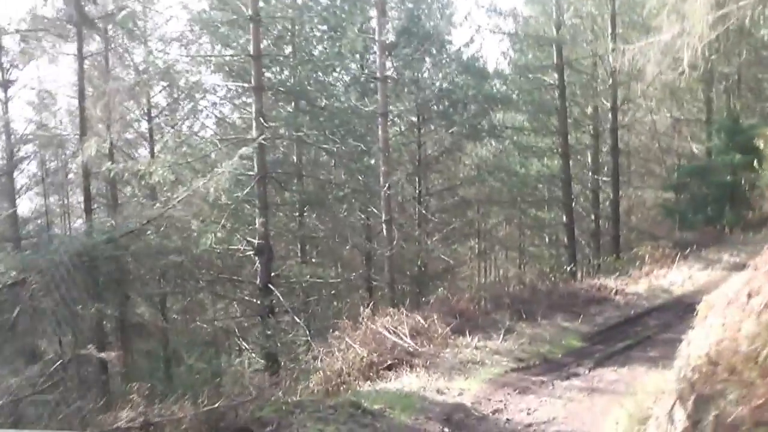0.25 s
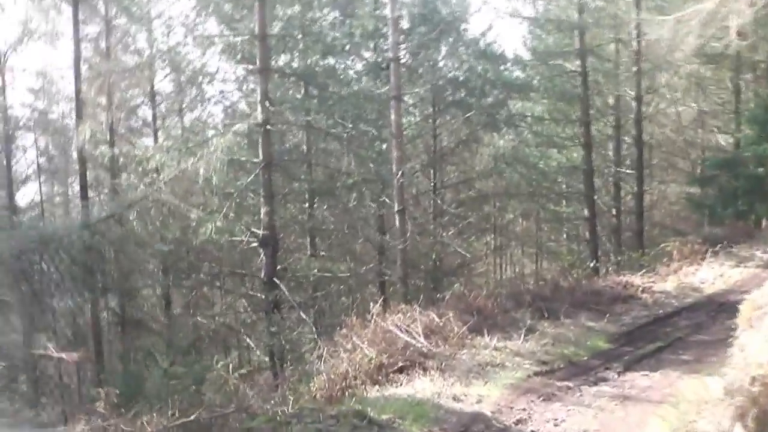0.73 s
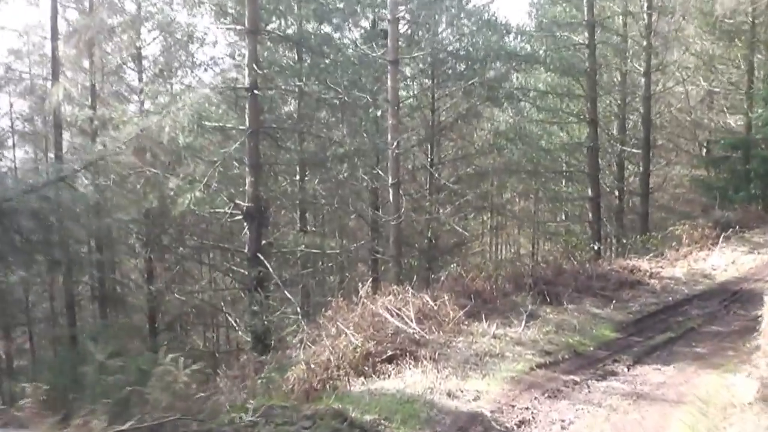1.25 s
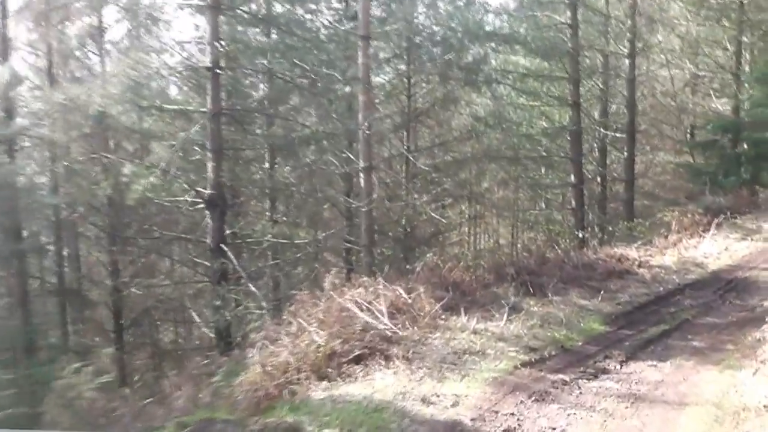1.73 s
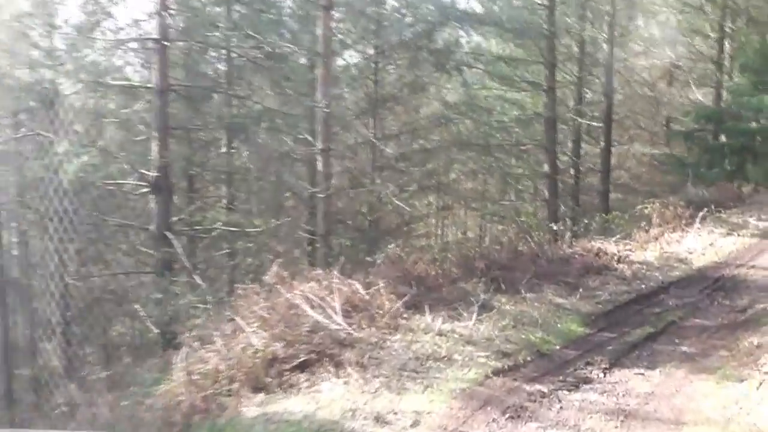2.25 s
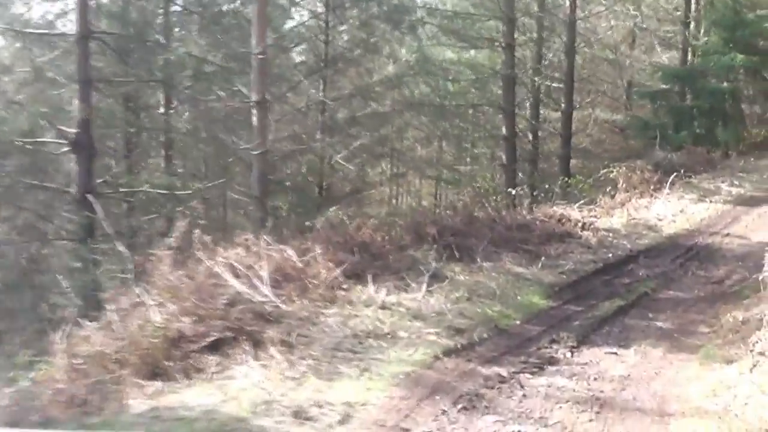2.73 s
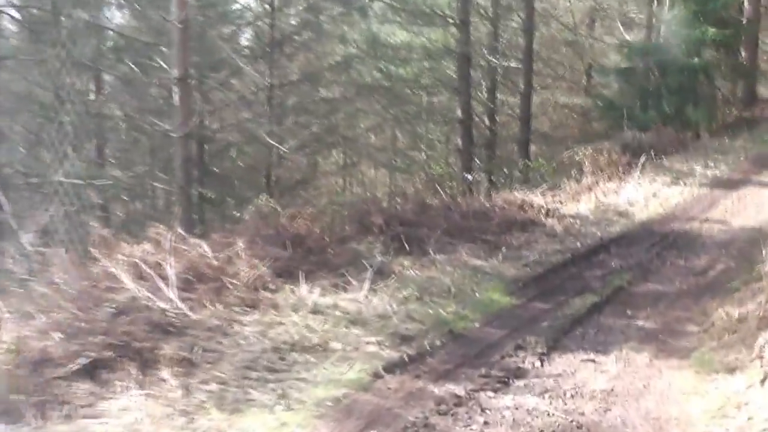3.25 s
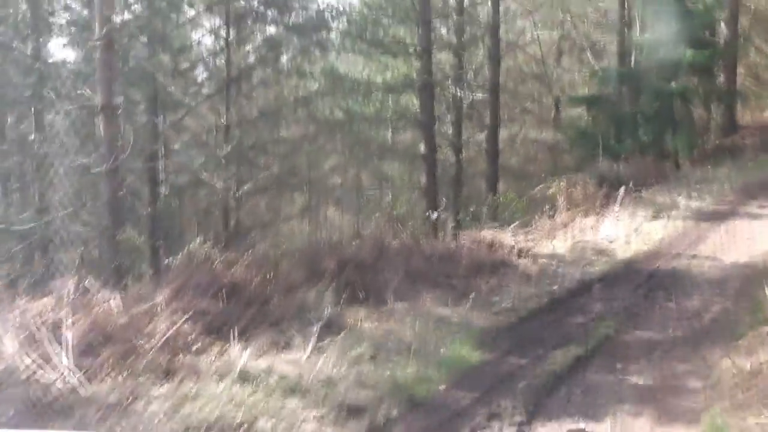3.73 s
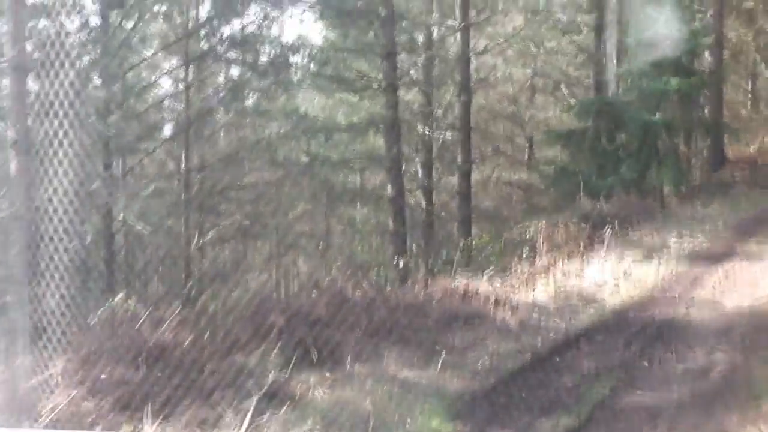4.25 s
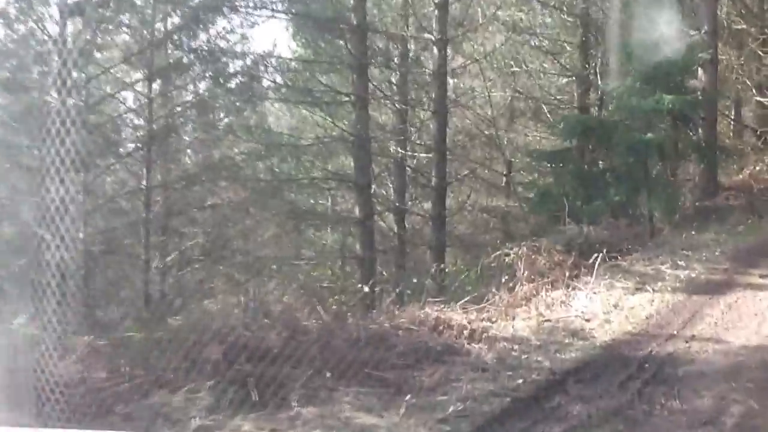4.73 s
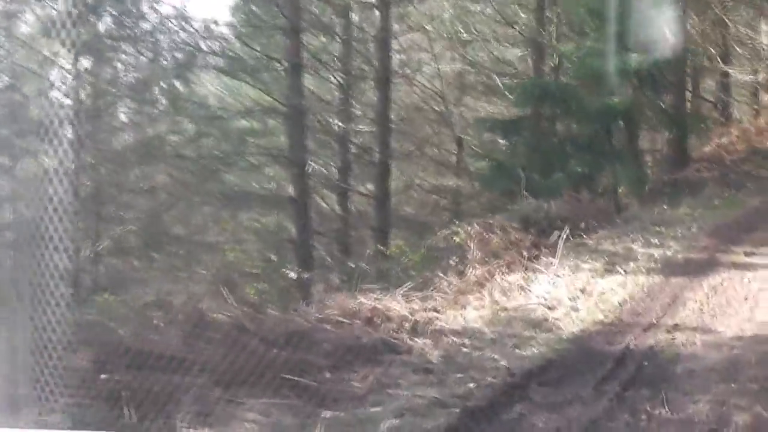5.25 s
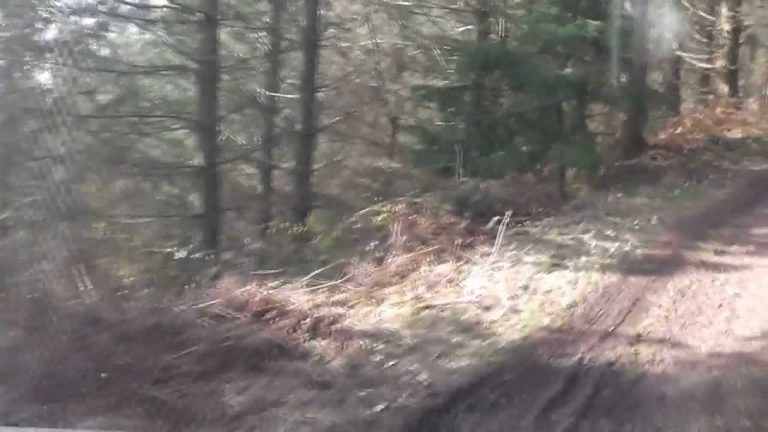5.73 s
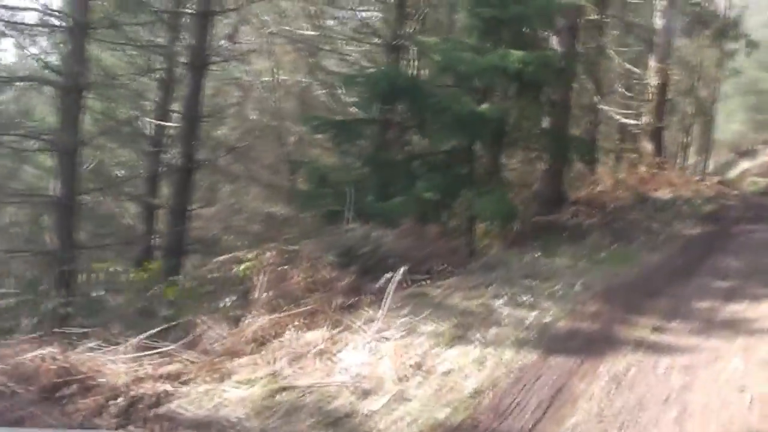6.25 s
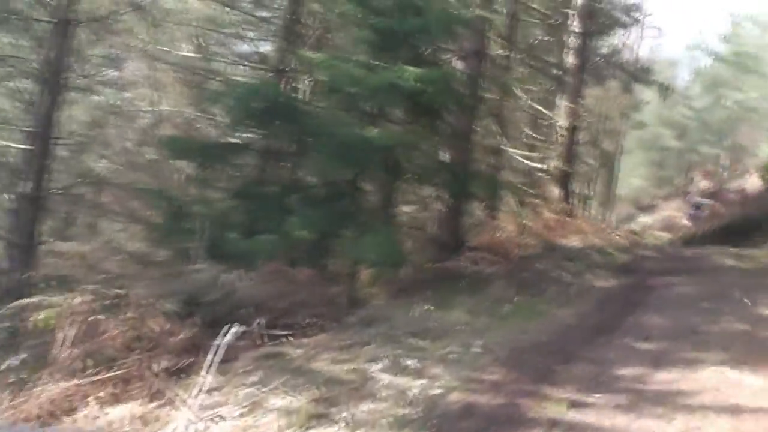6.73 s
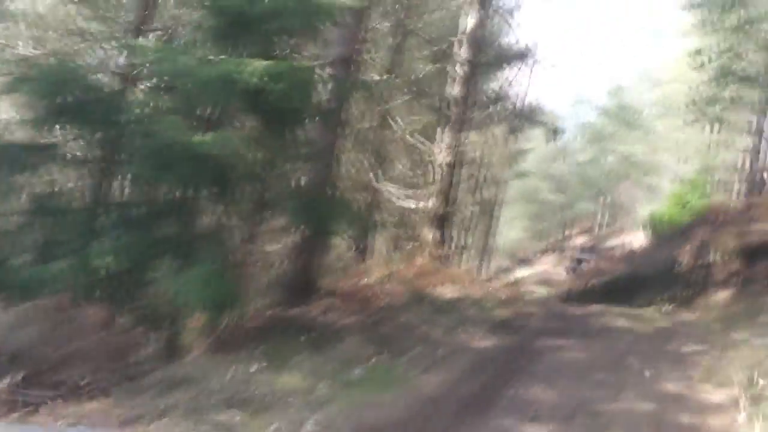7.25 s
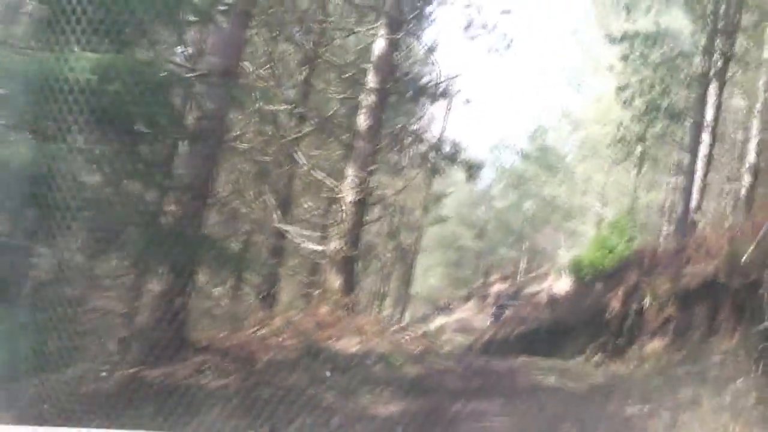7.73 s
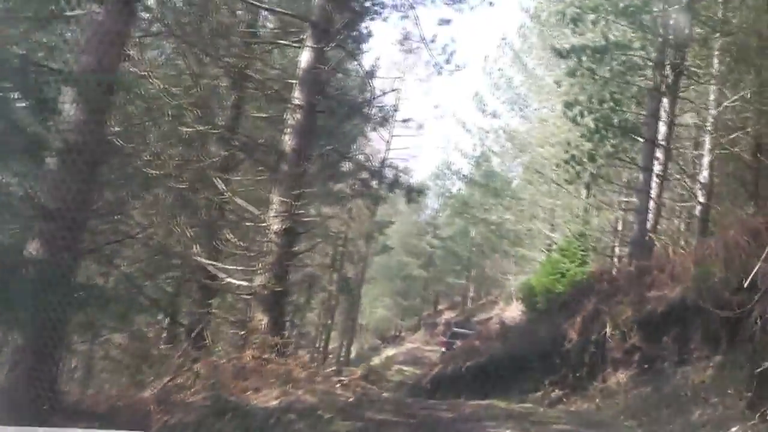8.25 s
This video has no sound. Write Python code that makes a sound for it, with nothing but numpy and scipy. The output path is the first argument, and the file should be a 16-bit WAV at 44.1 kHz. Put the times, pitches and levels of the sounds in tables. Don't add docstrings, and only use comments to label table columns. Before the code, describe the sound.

Inside a four-wheel-drive crawling over a rutted forest track, a small stereo microphone near the dashboard catches a deep boom near 28 Hz that swells with each rut. At 0-0.6 s heavy suspension thuds and two loud trim clacks hit, almost overloading, with keys shaken briefly; another thud lands at 1 s. A low four-cylinder hum, faint gear whine and fine rustling hiss continue. Around 2.1 s a softer thump, then at 2.7-2.9 s knocks and a dull clack. Near 4.1 s a strong jolt, with tiny dry squeaks at 3.9, 4.1 and 4.8 s. Engine pitch climbs from 5 to 6 s. Bumps at 5.6 s and a heavy double thud at 6.1 s follow. A hard clack cracks at 7.2 s with dull slaps after; at 7.85 s thuds toss the keys loudly, then ticks and rumble trail to 8.5 s.

```python
import sys
import numpy as np
from scipy import signal
from scipy.fft import rfft, irfft, next_fast_len
from scipy.io import wavfile
from scipy.ndimage import uniform_filter1d

SR = 44100
rng = np.random.default_rng(int(sys.argv[2]) if len(sys.argv) > 2 else 0)


def wav_record(signal):
    frames = np.transpose(np.atleast_2d(signal))
    bounded = np.clip(frames, -1, 1)
    quanta = np.round(bounded * 32767).astype(np.int16)
    wavfile.write(sys.argv[1], SR, quanta)


def amplitude_ratio(level_db):
    exponent = np.asarray(level_db, float) / 20
    return 10 ** exponent


N = 374409


def unit(x):
    return x / np.sqrt(np.mean(x ** 2) + 1e-20)


def in_time(rows):
    s, *columns = np.transpose(rows)
    return [np.interp(np.arange(N) / SR, s, c) for c in columns]


def at_hz(points, hz):
    point_hz, level_db = np.transpose(points)
    return np.interp(np.log(hz), np.log(point_hz), level_db)


def fine(coarse):
    return np.interp(np.arange(N) / 40, np.arange(len(coarse)), coarse)


def drift(rate):
    r = np.exp(-80 * np.pi * rate / SR)
    slow = signal.lfilter([1], [1, -2 * r, r * r], rng.standard_normal(N // 40 + 2002))
    return fine(unit(slow[2000:]))


def ring(drive, hz, t60):
    r, w = amplitude_ratio(-60 / (t60 * SR)), 2 * np.pi * hz / SR
    return signal.lfilter([0, np.sin(w)], [1, -2 * r * np.cos(w), r * r], drive + 1e-18)


# frequency in Hz, side against mid in dB.
WIDTH = [(30, -19.5), (200, -28.5), (380, -19.5), (700, -16), (1290, -13.5), (2380, -11.5), (4400, -7.5),
         (8120, -5), (15000, 2)]


def coloured(spectrum, even_s):
    length = next_fast_len(N)
    hz = np.maximum(np.fft.rfftfreq(length, 1 / SR), 1)
    colour = amplitude_ratio(at_hz(spectrum, hz)) * np.array([np.ones(len(hz)), amplitude_ratio(at_hz(WIDTH, hz))])
    pair = irfft(rfft(rng.standard_normal((2, length))) * colour, length)[:, :N]
    size = int(even_s * SR)
    power = uniform_filter1d(uniform_filter1d(pair[0] ** 2, size), size)
    return pair / np.sqrt(power + 1e-20)


def bursts(noise, times, peaks_db, swells, t60s):
    envelope = np.zeros(N)
    for s, db, swell, t60 in zip(times, peaks_db, swells, t60s):
        at = round(s * SR)
        age = np.arange(min(round(t60 * SR), N - at)) / SR
        envelope[at:at + len(age)] += amplitude_ratio(db - 60 * age / t60) * np.minimum(age / swell, 1)
    return noise * envelope


def swells(times, peaks_db, lengths):
    fade_db, rise_share = 20, 0.44
    times, peaks_db, lengths = [np.reshape(column, (-1, 1)) for column in (times, peaks_db, lengths)]
    late = np.arange(0, N + 40, 40) / SR - times
    share = np.where(late < 0, rise_share, 1 - rise_share)
    return amplitude_ratio(2 * (peaks_db - fade_db / 2 * np.abs(late) / (share * lengths)))


def centred(x, side_db):
    reflection = np.roll(x, round(0.005 * SR)) - np.roll(x, round(0.0018 * SR))
    return np.array([x, amplitude_ratio(side_db) * reflection])


# frequency in Hz, level in dB per Hz.
RUSTLE = [(1500, -90), (2600, -15), (3300, -12), (3750, -10.5), (4000, -5.5), (4300, -1), (5600, -4),
          (8300, -5.5), (9800, -2.5), (10600, -1), (11300, -3.5), (12500, -8), (15700, -12.5)]
# time in seconds, level in dB, brightness in dB.
ASTIR = [(0, -56, -1), (.2, -64.5, 2), (.58, -60.5, -2), (.9, -61.5, 3), (1.62, -64, 8.5), (1.78, -62, 6.5),
         (1.94, -66.5, 0), (2.12, -60.5, 3.5), (2.75, -64.5, 0), (4.36, -65.5, 1), (4.85, -64.5, -1.5),
         (4.98, -63, 3.5), (5.12, -62.5, -1.5), (5.6, -62.5, -1.5), (6.42, -60, -2.5), (7.79, -61, -1),
         (7.89, -55, -5), (8.48, -64, 4)]
# frequency in Hz, level in dB.
VENTS = [(3990, -75), (8420, -86), (9220, -83), (10600, -81), (13400, -88)]


def rustle():
    low_db, bright_db = in_time(ASTIR)
    hiss = coloured(RUSTLE, even_s=0.13)
    contacts = (rng.random((5, N)) < 70 / SR) * rng.exponential(.5, (5, N))
    shared, *own = signal.lfilter([1], [1, -np.exp(-1 / (.004 * SR))], contacts)
    above = [signal.sosfiltfilt(signal.butter(2, hz, "high", fs=SR, output="sos"), hiss)
             for hz in (2000, 4900, 6500, 9200)]
    bands = []
    for patch, wide, rest in zip(own, above, above[1:] + [0]):
        waver_db = 1.1 * drift(8.6) + 1.8 * drift(2.8)
        bands.append((1 + patch) * amplitude_ratio(waver_db) * (wide - rest))
    low = amplitude_ratio(low_db - 2.0) * unit(bands[0] + bands[1])
    bright = amplitude_ratio(low_db + bright_db - 2.0) * unit(bands[2] + bands[3])
    vents = sum(amplitude_ratio(db) * unit(ring(hiss, hz, 0.009)) * amplitude_ratio(3 * drift(2.8)) for hz, db in VENTS)
    return (1 + .3 * shared) * (low + bright) + vents


# time in seconds, firing rate in Hz.
FIRING = [(0, 39.5), (1.8, 39.6), (3.05, 44.6), (3.55, 43.2), (4.0, 45.5), (4.25, 44.2), (4.55, 45.5),
          (4.95, 46), (5.25, 49.2), (5.9, 53.7), (6.2, 54.8), (6.55, 54.4), (6.72, 53.7), (7.1, 53.8),
          (7.4, 55.3), (7.68, 52.3), (7.95, 53), (8.3, 54.4)]
# time in seconds, load in dB, strain in dB per multiple (below zero it dulls the upper
LOAD = [(0, 5.5, 0), (.8, -4.5, 0), (1.6, -8.5, 0), (1.9, -1, 0), (2.6, 0.5, 0), (3.1, -3.5, -0.5),
        (3.6, -1, 0), (4.1, -3, 0), (4.4, -2, -.5), (5, 0, -.5), (5.2, -2.5, 0), (5.5, -1.5, 0),
        (6, -10.5, 0), (6.5, -3.5, -2), (7.15, -2, -2), (7.4, 0, 0), (8, -2.5, -.5), (8.49, -5.5, -1)]
HARMONICS_DB = [-40, -32, -41, -36, -47, -38, -42, -40, -42, -43, -54, -52, -57, -55, -58, -60, -66, -66,
                -66, -68, -66, -57, -65, -57]
# frequency in Hz, width in Hz, lift in dB.
PANELS = [(183, 32, 10), (335, 50, 6), (420, 60, 8), (1185, 60, 13)]
# multiple of the firing rate, level in dB.
GEARS = [(24, -62), (26, -59), (45, -80)]


def engine():
    (rate,), (load_db, strain_db) = in_time(FIRING), in_time(LOAD)
    turn, out = 2 * np.pi * np.cumsum(rate) / SR, np.zeros(N)
    for k, level_db in enumerate(HARMONICS_DB, 1):
        lift_db = sum(db / (1 + (2 * (k * rate - hz) / width) ** 2) for hz, width, db in PANELS)
        throttle_db = load_db + strain_db * np.clip(k - 5, -1, 4)
        waver_db = 3 * drift(5)
        slip = min(.35 + .03 * k, .6) * drift(3.5) + rng.uniform(0, 6)
        out += amplitude_ratio(level_db + lift_db + throttle_db + waver_db) * np.sin(k * turn + slip)
    for k, level_db in GEARS:
        out += amplitude_ratio(level_db + 5 * drift(3)) * np.sin(k * turn + 1.6 * drift(6))
    return centred(np.sqrt(2) * out, side_db=-26.0)


# middle in seconds, peak in dB, length in seconds, pitch in Hz.
SQUEAKS = [
    (3.923, -56, 0.026, 7460),
    (4.114, -60, .02, 7590),
    (4.779, -61, 0.028, 7200),
    (4.821, -61, 0.062, 7010),
    (5.982, -68, .03, 14900),
]


def squeaks():
    out, sag_hz_per_s = np.zeros(N), 2700
    for s, db, length, hz in SQUEAKS:
        late = np.arange(-round(length * SR), round(length * SR)) / SR
        turn = 2 * np.pi * (hz * late - sag_hz_per_s * late ** 2 / 2)
        at = round((s - length) * SR)
        out[at:at + len(late)] += amplitude_ratio(db - 75 * (late / length) ** 2) * np.sqrt(2) * np.sin(turn)
    return centred(out, side_db=-9)


# start in seconds, peak in dB, swell in seconds, t60 in seconds.
JINGLES = [
    (.075, -47, 0.023, .2),
    (.512, -38, 0.0067, 0.049),
    (.972, -50, 0.0037, 0.59),
    (5.905, -58, .005, .2),
    (6.03, -58, .01, .15),
    (6.372, -54, .005, .4),
    (7.845, -25.5, 0.007, 0.086),
    (7.893, -41.5, 0.0077, 0.22),
]
# frequency in Hz, level in dB, t60 in seconds.
KEYS = [(7000, -15, 0.019), (10000, -10, .02), (11400, -1, .015), (11900, -4, .02), (12150, 2, .012),
        (12600, -21, .02)]


def keys():
    bright = signal.butter(3, [5000, 13500], "band", fs=SR, output="sos")
    grains = rng.standard_normal((2, N)) * amplitude_ratio(2.0 * drift(150.0))
    contacts = unit(signal.sosfilt(bright, grains))
    last = bursts(contacts, *np.transpose(JINGLES[-1:]))
    rings = sum(amplitude_ratio(level_db - 26) * ring(last, hz, t60) for hz, level_db, t60 in KEYS)
    toss = bursts(contacts, *np.transpose(JINGLES[-2:-1]))
    rings += sum(amplitude_ratio(-27) * ring(toss, hz, .008) for hz in (11300, 12500))
    mid, side = bursts(contacts, *np.transpose(JINGLES))
    return np.array([mid, amplitude_ratio(-6) * side - .15 * mid]) + rings * amplitude_ratio([[0], [2.5]])


# start in seconds, peak in dB, ring in Hz.
TICKS = [(.0248, -27, 4750), (.0408, -27, 4280), (.0415, -34, 5700), (0.5478, -17, 4280),
         (0.8989, -25, 4900), (.9737, -30, 4030), (.9657, -25, 6950), (1.247, -34, 4960),
         (1.4108, -28.5, 4530), (1.8574, -32, 4500), (2.118, -34, 6830), (3.191, -33, 4570),
         (3.486, -34, 4500), (3.7465, -33, 4860), (3.8173, -28, 5030), (3.9856, -35, 4785),
         (4.082, -28.5, 6400), (4.5311, -33.5, 4500), (5.19, -34, 4590), (5.584, -34, 4780),
         (6.0322, -34, 4506), (6.104, -37, 5400), (6.124, -36, 4000), (4.5161, -36, 4300),
         (1.2326, -36, 3970), (7.9738, -33, 4040), (8.1235, -37, 4610), (6.3997, -31, 4660),
         (6.8606, -33, 5340), (7.202, -13, 4270), (8.0513, -29.5, 4640), (8.1359, -33, 9640),
         (8.4156, -34, 10080), (8.4644, -28.5, 4560)]
# start in seconds, peak in dB, ring in Hz.
FLECKS = [(0.4594, -46, 4020), (0.5846, -43, 4150), (1.9759, -48, 4200), (2.1, -43, 6680),
          (2.7771, -54, 3800), (2.807, -48, 4220), (2.9367, -42, 4180), (3.908, -47, 3890),
          (4.0372, -42, 3990), (4.4244, -47, 3820), (4.5675, -45, 4070), (4.6394, -48, 4150),
          (4.7057, -47, 4500), (4.9494, -47, 4130), (5.0895, -49, 4046), (5.2834, -46, 4070),
          (5.3143, -47, 4000), (5.6296, -44, 3990), (5.6494, -48, 3950), (5.8566, -47, 3937),
          (6.773, -41, 4720), (7.3089, -43, 3890)]
# start in seconds, peak in dB.
LATCH = [(.6933, -31), (1.7616, -31), (1.8171, -34), (1.933, -32), (3.109, -31), (3.7752, -35),
         (4.124, -31), (4.496, -32), (5.903, -33), (6.203, -32), (6.3707, -28.5), (6.8108, -33),
         (3.241, -35), (5.712, -35), (7.577, -31.5), (7.9844, -28), (8.2163, -34), (8.2577, -26.5),
         (8.333, -28.5)]


def ticks():
    noise = signal.lfilter([.45], [1, -.65], coloured(RUSTLE, even_s=0.0046))
    out, age = np.zeros((2, N)), np.arange(round(.05 * SR)) / SR
    envelope = (amplitude_ratio(-60 * age / 0.012) + amplitude_ratio(-5 - 60 * age / 0.05)) * np.minimum(age / 0.0016, 1)
    flecks = [(s, db + 6.5, hz) for s, db, hz in FLECKS]
    latch = [(s, db, 3900) for s, db in LATCH]
    for s, db, hz in TICKS + flecks + latch:
        at = round(s * SR)
        puff = noise[:, at:at + len(age)]
        puff = puff * envelope[:puff.shape[1]]
        rung = .08 * ring(puff, hz, .005)
        out[:, at:at + puff.shape[1]] += amplitude_ratio(db - 9.5) * (1.27 * puff + rung)
    return np.array([out[0], 0.72 * out[1] - 0.13 * out[0]])


# start in seconds, peak in dB, ring in Hz.
KNOCKS = [(0.401, -23, 620), (0.85, -27, 501), (2.199, -24, 452), (2.776, -16, 560), (2.853, -14, 510),
          (2.896, -20, 730), (2.913, -20, 452), (2.926, -21, 480), (3.18, -22, 478), (3.789, -15, 620),
          (3.994, -18, 455), (4.069, -19, 600), (4.12, -12, 506), (4.199, -25, 493), (4.624, -15, 580),
          (4.711, -23, 643), (5.235, -21, 538), (5.489, -23, 618), (5.55, -20, 616), (5.574, -16, 560),
          (5.589, -19, 465.5), (5.712, -28, 746), (5.758, -20, 506), (5.969, -28, 485), (6.088, -19, 546),
          (6.423, -20, 655), (6.627, -26, 597.6), (7.554, -15, 448), (7.903, -19, 608)]


def knocks():
    out, age = np.zeros(N + SR), np.arange(round(.06 * SR)) / SR
    t60_s, overtones = 0.04, [(1, -1.5), (1.87, -8.5), (2.9, -23)]
    for s, db, hz in KNOCKS:
        at = round(s * SR)
        knock = sum(amplitude_ratio(db + level_db - 60 * age * ratio / t60_s) * np.sin(2 * np.pi * ratio * hz * age)
                    for ratio, level_db in overtones)
        out[at:at + len(age)] += knock * np.minimum(age / 0.001, 1)
    return centred(out[:N], side_db=-22)


# start in seconds,
# peak in dB, crack minus body in dB.
CLACKS = [(0.0407, -5.5, -17), (0.547, -4.5, -13), (0.899, -34, 5.5), (2.908, -19, -25),
          (2.924, -13.5, -32), (6.105, -18, -27), (6.126, -19, -28), (6.866, -13, -27),
          (7.203, -4.5, -10.5), (7.293, -7, -28), (7.3535, -10, -33)]
# frequency in Hz, level in dB, t60 in seconds.
TRIM = [(383, -3, .05), (560, 1, 0.048), (710, -5.5, .05), (810, 0, 0.034), (975, -2, 0.042),
        (1071, 0, 0.039), (1297, -3.5, .04), (1543, -9.5, .045), (1702, -7.5, 0.03), (1850, -14, 0.016),
        (2100, -10.5, .02), (2470, -12.5, 0.016)]
# seconds after the slap, level in dB.
REBOUNDS = [(.0035, -5), (.0075, -4), (.0115, -6), (.016, -12)]
# frequency in Hz, level in dB per Hz.
CRACK = [(500, -26), (1500, 7.5), (2470, -2), (3000, -20), (4250, -1), (5860, -6.5), (11900, -17),
         (15800, -34)]
# frequency in Hz, level in dB, t60 in seconds.
EDGE = [(2310, 3, 0.02), (2780, -0.5, 0.0078), (3230, -10, 0.012), (3700, -15, 0.0084), (4240, -1.5, 0.02),
        (5060, -8, 0.0083), (6950, -4, 0.013)]


def clacks():
    s, db, crack_db = np.transpose(CLACKS)
    slap = np.round(s * SR).astype(int)
    first = np.zeros(N)
    first[slap] = amplitude_ratio(db)
    rattle = rng.standard_normal(N) * (rng.random(N) < 900 / SR)
    contacts = bursts(rattle, s, db - 20.0, 0 * s + .001, 0 * s + 0.082)
    for (late_s, loss_db), chance in zip(REBOUNDS, rng.standard_normal((len(REBOUNDS), len(s)))):
        again = s + late_s * (1 + .06 * chance)
        contacts[np.round(again * SR).astype(int)] -= amplitude_ratio(db + loss_db)
    contacts = first + signal.lfilter([.2], [1, -.8], contacts)
    out = np.zeros(N)
    for k, (hz, level_db, t60) in enumerate(TRIM):
        out += amplitude_ratio(level_db - 13.0) * (-1) ** (k // 3) * ring(contacts, hz, t60)
    crack = bursts(coloured(CRACK, even_s=0.0029), s, db + crack_db + 0.5, 0 * s + 0.000057, 0 * s + 0.014)
    first[slap] = amplitude_ratio(db + crack_db)
    for k, (hz, level_db, t60) in enumerate(EDGE):
        out += amplitude_ratio(level_db - 9.0) * (-1) ** k * ring(first, hz, t60)
    return centred(out, side_db=-21) + crack * amplitude_ratio([[0], [-5]])


# start in seconds, peak in dB,
# ring in Hz, t60 in seconds.
THUDS = [(0.077, -18, 316, 0.3), (0.11, -4, 203, 0.12), (0.25, -4.5, 152, 0.061), (0.48, -3, 65, 0.13),
         (1.0109, -6.5, 111.5, 0.34), (5.6206, -21, 65, 0.28), (6.1, -8.5, 69, 0.53),
         (4.1695, -18, 76.7, 0.37), (7.88, -7, 94.3, 0.15), (2.132, -9, 141, 0.09), (2.88, -9.5, 207, 0.27),
         (3.999, -12.5, 228, 0.14), (4.097, -8.5, 460, 0.063), (4.104, -9, 516, 0.056),
         (2.9, -10.5, 93, 0.28), (4.1171, -4, 212, 0.16), (4.851, -17, 170, 0.26), (5.3, -18, 214, 0.14),
         (6.106, -5, 204, 0.12), (6.129, -3, 210, 0.19), (5.7, -9, 280, 0.068), (7.862, -5, 171, 0.072),
         (7.87, -3, 427, 0.038), (0.062, -30, 1550, 0.09), (0.082, -25, 1530, 0.054),
         (.083, -31, 2100, 0.037), (.101, -28, 1520, 0.064), (0.18, -22, 1000, .03),
         (0.068, -26, 1000, .04), (5.546, -27, 1200, .04), (.499, -23, 1120, .04), (.552, -19.5, 1690, .06),
         (6.104, -27, 1530, 0.064), (6.136, -27.5, 1520, .07), (7.98, -11.5, 235, .12), (4.68, -14, 95, .4),
         (.86, -14, 150, .15), (.9, -17, 280, .15), (7.355, -16, 600, .05), (8.12, -17, 110, 0.14),
         (2.62, -14, 396, .08), (7.295, -12, 450, .06), (5.6, -33, 1300, 0.046), (3.045, -24, 1150, 0.025),
         (4.108, -13.5, 640, 0.054), (7.6, -28, 1900, 0.037), (2.70, -10.5, 170, 0.21),
         (5.575, -26, 720, 0.11), (8.26, -16.5, 380, 0.29), (5.36, -18.5, 340, 0.24),
         (6.9, -14, 79.8, 0.17), (1.27, -14, 185, 0.19)]


def thuds():
    out = np.zeros(N)
    for s, db, hz, t60 in THUDS:
        at = round(s * SR)
        age = np.arange(min(round(t60 * SR), N - at)) / SR
        rise = (1 - np.exp(-age * min(hz, 250) * 3.6)) ** 2
        out[at:at + len(age)] += amplitude_ratio(db - 60 * age / t60) * rise * np.sin(2 * np.pi * hz * age)
    return centred(out, side_db=-26.5)


# peak time in seconds, chassis in dB, length in seconds,
# floor pan minus chassis in dB.
BUMPS = [(0.088, -7.5, 0.16, -5), (0.538, -10, 0.43, -5.5), (0.878, -19.5, 0.39, -2),
         (1.274, -19.5, 0.97, -5.5), (1.795, -16.5, 0.22, -3), (2.145, -19, 1, -3.5),
         (2.956, -13.5, 0.47, -4.5), (3.246, -17.5, 0.72, -2), (3.668, -14.5, 0.47, -7),
         (4.119, -11.5, 0.37, -3.5), (4.627, -21.5, 1, -1.5), (5.013, -19.5, 0.47, -4),
         (5.191, -26, 0.12, 3), (5.418, -20.5, 0.14, 2.5), (5.605, -12, .2, -2.5), (5.74, -22, 0.2, -1),
         (5.912, -22, 0.35, 3.5), (6.144, -12.5, 0.37, -3.5), (6.451, -17, 1, -3.5), (7.13, -25.5, 1, 2),
         (7.89, -14, 0.13, 0), (8.028, -18, 0.13, -0.5), (8.455, -20.5, 0.62, 1)]
# start in seconds, peak in dB, swell in seconds,
# t60 in seconds.
JOLTS = [(.06, -25, 0.028, 0.092), (2.853, -46, 0.0024, 0.04), (2.9, -23, 0.019, 0.09),
         (5.57, -29.5, 0.018, 0.089), (4.1, -45, 0.017, 0.12), (6.099, -21, 0.013, 0.085),
         (7.86, -36, 0.064, 0.31)]
# frequency in Hz, level in dB per Hz.
CHASSIS = [(20, -96), (32, -0.5), (40, 5), (58, -4.5), (71, -0.5), (85, -4), (125, -11.5), (160, -79)]
FLOOR_PAN = [(74, -49), (125, -5), (183, 1), (248, -8.5), (313, -2.5), (357, -9.5), (400, -6), (520, -20),
             (750, -94)]
FIREWALL = [(310, -8), (520, -0.5), (796, -1.5), (899, -5), (1220, -6.5), (1520, -11.5), (1840, -17),
            (2270, -25), (2450, -31), (3200, -41), (4500, -100)]


def body():
    s, peak_db, length, pan_db = np.transpose(BUMPS)
    power, (rate,) = swells(s, peak_db, length), in_time(FIRING)
    rolling_power = amplitude_ratio(2 * -26)
    chassis = np.sqrt(fine(power.sum(axis=0)) + rolling_power)
    pan = np.sqrt(fine(amplitude_ratio(2 * pan_db) @ power) + rolling_power)
    drone = np.hypot(amplitude_ratio(-35.5 + 0.2749 * (rate - 46.0)), amplitude_ratio(-22.5) * chassis)
    bump_db = 1.67 * drift(13.4)
    flutter_db = .5 * bump_db + .7 * drift(14.0)
    firing, throb = np.cumsum(rate) / SR, 0.23
    pan = pan * (1 + throb * np.cos(2 * np.pi * firing) + throb * 0.63 * np.cos(np.pi * firing + drift(2.4)))
    wall = coloured(FIREWALL, even_s=.04)
    tilt = signal.lfilter([1, -.7], [1], wall)
    jolts = bursts(unit(tilt * amplitude_ratio(4.1 * drift(70.0))), *np.transpose(JOLTS))
    return (chassis * amplitude_ratio(-0.63 + bump_db) * coloured(CHASSIS, even_s=0.053)
            + pan * amplitude_ratio(-2.5 + bump_db) * coloured(FLOOR_PAN, even_s=0.054)
            + drone * amplitude_ratio(flutter_db) * wall
            + jolts)


# peak time in seconds, peak in dB, length in seconds, ring in Hz.
RUTS = [(.06, -22.5, 0.09, 28.5), (0.227, -11.5, 0.12, 28.94), (0.524, -15.5, 0.17, 30.25),
        (0.654, -9.5, .2, 30.23), (1.049, -7, 0.11, 28), (1.5, -17, 0.21, 25.7), (1.777, -12, 0.21, 28.6),
        (2.141, -8.5, 0.12, 28), (2.495, -19, 0.24, 26.3), (2.687, -11, 0.43, 26.65),
        (3.086, -12, 0.067, 30.5), (3.257, -12.5, 0.44, 28.92), (3.685, -7, 0.13, 25.57),
        (3.99, -11, 0.25, 26.7), (4.248, -16, 0.35, 27.17), (4.549, -20, 0.71, 28),
        (4.995, -15, 0.52, 26.2), (5.149, -10.5, 0.089, 28), (5.685, -9.5, 0.22, 28),
        (5.888, -9, 0.12, 27.14), (6.142, -14, 0.21, 25.84), (6.28, -11.5, 0.13, 28.6),
        (6.439, -18.5, 0.14, 28.53), (6.571, -13.5, 0.52, 27.42), (7.067, -17.5, 0.49, 29.43),
        (7.287, -16, 0.46, 30.56), (7.883, -12.5, 0.31, 28), (8.277, -30, 0.24, 27.6)]
# frequency in Hz, level in dB per Hz.
HEAVE = [(7, -10), (12, 30.5), (20, 9.5), (45, 15.5), (60, -45), (110, -120)]


def boom():
    s, peak_db, length, ring_hz = np.transpose(RUTS)
    idle_hz, idle = 28, amplitude_ratio(2 * -26.5)
    power = swells(s, peak_db, length)
    total = power.sum(axis=0) + idle
    hz = fine((ring_hz @ power + idle_hz * idle) / total)
    level = fine(np.sqrt(total))
    swing = np.sqrt(2) * np.sin(2 * np.pi * np.cumsum(hz) / SR + .5 * drift(7.1))
    heave = level * amplitude_ratio(-6) * coloured(HEAVE, even_s=0.14)
    return centred(level * amplitude_ratio(1.6) * swing, side_db=-28.0) + heave


def scene():
    vehicle = engine() + boom() + body() + rustle()
    mid, side = vehicle + thuds() + knocks() + clacks() + ticks() + keys() + squeaks()
    bass = signal.sosfiltfilt(signal.butter(1, 500, fs=SR, output="sos"), mid)
    side = side - (amplitude_ratio(.5) - 1) * 0.34 * bass - 0.029 * mid
    return np.array([mid + side, mid - side])


def roll_off(x):
    return signal.sosfilt(signal.butter(12, 16290, fs=SR, output="sos"), x)


def record(dry):
    knee = 14.0
    held = dry / (1 + np.abs(dry) ** knee) ** (1 / knee)
    cut = signal.sosfilt(signal.cheby2(24, 40, 15850, fs=SR, output="sos"), held)
    return roll_off(cut)


dry = scene()
out = record(dry)
wav_record(out)
```